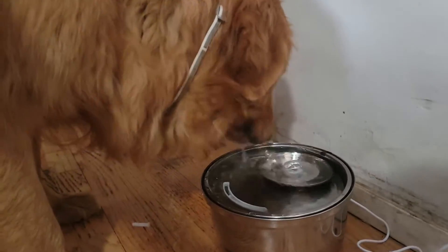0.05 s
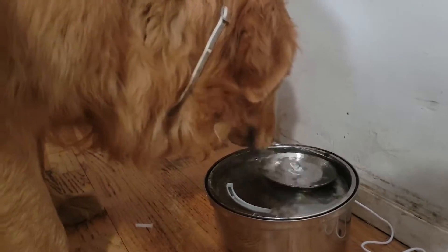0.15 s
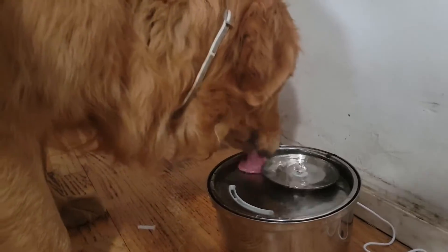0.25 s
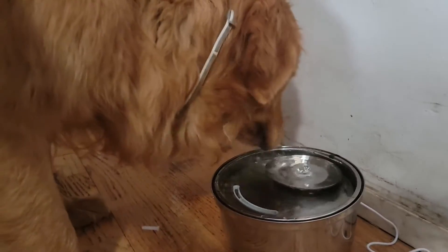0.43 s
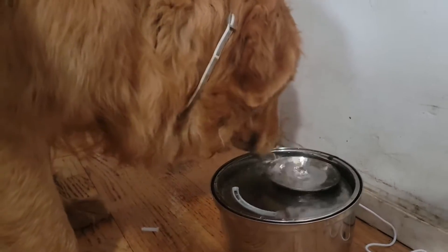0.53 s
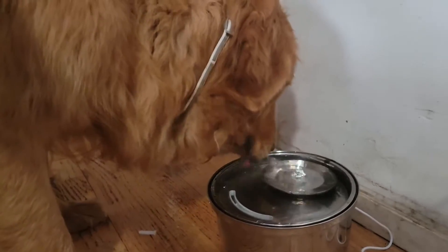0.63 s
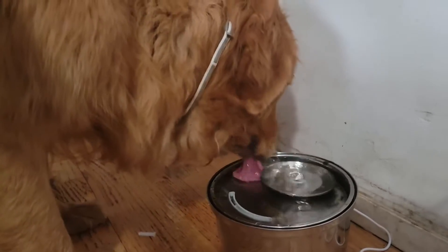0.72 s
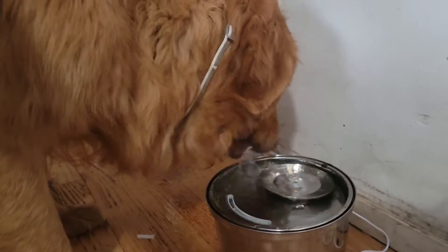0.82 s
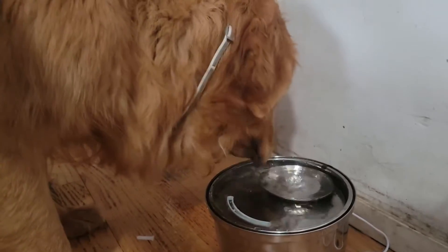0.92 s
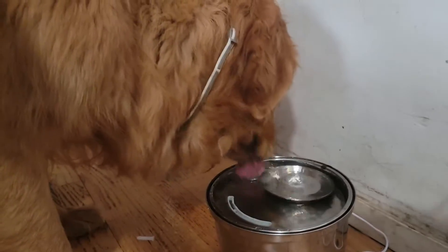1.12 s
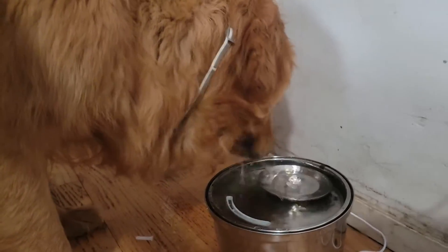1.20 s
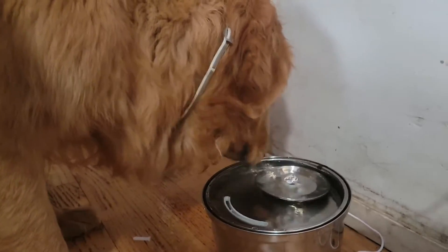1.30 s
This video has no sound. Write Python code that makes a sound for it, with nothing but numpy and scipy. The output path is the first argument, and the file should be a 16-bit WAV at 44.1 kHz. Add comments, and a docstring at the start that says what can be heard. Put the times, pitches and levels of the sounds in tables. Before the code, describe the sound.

A dog laps water from a small trickling fountain, with wet tongue smacks.

```python
"""A dog laps water from a small steel drinking fountain in a quiet room.
Each smack of the tongue excites the resonances of the mouth cavity; the tongue clicks as it peels free.
Trapped air resonates: small bubbles plink, large pockets gulp, and clouds of bubbles slosh in the bowl.
Bursting films tick. Underneath, the fountain trickles, gurgles and sizzles, and its pump hums."""
import sys
import numpy as np
from scipy import signal
from scipy.fft import rfft, irfft
from scipy.io import wavfile

SR = 44100
rng = np.random.default_rng(int(sys.argv[2]) if len(sys.argv) > 2 else 0)


def output_pcm(signal):
    """Save a mono or channel-first signal as 16-bit PCM at the path in sys.argv[1].

    Samples are clipped to [-1, 1] before scaling.
    """
    pcm = np.clip(np.atleast_2d(signal).T, -1, 1) * 32767
    wavfile.write(sys.argv[1], SR, np.round(pcm).astype(np.int16))


N = 59535
T = np.arange(N) / SR

# Level contour of the trickle: t/s, level/dB
TRICKLE_CONTOUR = [(0, -63.5), (0.13, -66.5), (0.23, -59), (0.36, -70.5), (0.57, -64), (0.66, -75),
                   (0.76, -88), (0.85, -70), (1.05, -67.5), (1.25, -75.5), (1.35, -64)]
# Spectrum of the trickle's hiss: f/Hz, relative density/dB
HISS_SPECTRUM = [(1500, -33), (3000, 4), (4200, 0), (4900, 7.5), (5800, -4), (7500, 0), (10000, -9.5),
                 (15500, -9)]
# Harmonics of the pump: harmonic number, level/dB, interaural phase/rad
PUMP_HARMONICS = [(1, -41.5, 0.17), (2, -54, 0.13), (3, -70.5, 0.42)]
# Spectrum of the room tone: f/Hz, relative density/dB
ROOM_TONE_SPECTRUM = [(22, -2.5), (45, 5.5), (100, 2.5), (170, -12), (300, -10.5), (600, -26), (2000, -21),
                      (4000, -33.5), (15000, -70)]
# Sizzles at the spout: crest t/s, level/dB
SPOUT_SIZZLES = [(0.049, -46.5), (0.537, -46.5), (0.654, -55.5)]
# Ringing bubbles and drops: t/s, f/Hz, level/dB
BUBBLE_PLINKS = [(0.184, 2110, -38.5), (0.187, 3820, -29.5), (0.196, 1430, -34.5), (0.242, 675, -33.5),
                 (0.260, 968, -24.5), (0.531, 4900, -29.5), (0.554, 3580, -28.5), (0.584, 2805, -28),
                 (0.593, 1520, -35.5), (0.685, 1490, -46.5), (0.736, 2060, -46), (0.733, 2910, -41.5),
                 (0.811, 2080, -44), (0.876, 2385, -42), (0.995, 1640, -41), (1.030, 768, -33),
                 (1.04, 1103, -26.5), (1.0718, 1482, -26.5), (1.071, 952, -23), (1.079, 5160, -25.5),
                 (1.08, 7070, -29), (1.081, 10550, -35), (1.172, 502, -36), (1.184, 912, -28.5),
                 (1.2175, 5090, -31), (1.27, 4270, -47), (1.280, 1104, -31.5), (1.326, 4080, -36),
                 (1.33, 2620, -33), (1.3365, 7800, -38), (1.337, 1300, -39.5)]
# Bursting films and spray: t/s, level/dB, centre f/Hz
FILM_TICKS = [(0.19, -35, 6400), (0.2735, -28.5, 12200), (0.41, -45, 5860), (0.784, -51.5, 2510),
              (0.812, -44.5, 2140), (0.794, -53, 3900), (0.924, -33, 850), (1.059, -44, 4430),
              (1.08, -41, 7560), (1.124, -34, 4070), (1.128, -34.5, 1440), (1.2209, -39.5, 5300),
              (1.278, -49.5, 1270), (1.2188, -42.5, 12600), (1.3234, -39, 5600), (1.326, -35, 2910),
              (1.335, -35, 5200)]
# Tongue smacks: t/s, level/dB, cavity f/Hz, relative rasp level/dB
TONGUE_SMACKS = [(0.1905, -34, 2960, 3), (0.2716, -8, 2123, -17), (0.5552, -31, 2260, -6),
                 (1.0682, -36, 2195, -26), (1.0742, -28, 2270, -3), (1.0797, -30, 2070, -0.5),
                 (1.0872, -32.5, 2110, -2), (1.3372, -34.5, 2860, -1)]
# Modes of the mouth: ratio to the cavity frequency, relative level/dB, T60/s
MOUTH_MODES = [(0.998, 2, 0.026), (1.321, -2.5, 0.026), (1.42, -2.5, 0.007), (1.87, -1, 0.0047)]
# Water stirred by the laps: crest t/s, rise constant/s, fall constant/s, level/dB, centre f/Hz
LAP_SLOSHES = [(0.248, 0.0063, 0.02, -40, 870), (0.583, 0.018, 0.06, -49.5, 682),
               (1.048, 0.05, 0.047, -41, 687), (1.128, 0.0056, 0.05, -43, 450),
               (1.138, 0.012, 0.053, -47.5, 2670), (0.193, 0.005, 0.01, -43, 3600),
               (0.549, 0.015, 0.024, -45.5, 3960), (1.048, 0.048, 0.036, -43.5, 1680),
               (1.288, 0.0075, 0.0081, -46.5, 1290), (0.549, 0.022, 0.042, -54, 14200),
               (0.865, 0.0061, 0.0041, -48, 6600), (1.338, 0.0049, 0.0069, -51, 3570)]
# Resonating air pockets: t/s, f/Hz, level/dB, T60/s
POCKET_GULPS = [(0.225, 175, -44.5, 0.068), (0.233, 294, -38, 0.11), (0.572, 287, -42.5, 0.13),
                (0.58, 174.5, -32, 0.055), (1.026, 80, -29.5, 0.13), (1.048, 193, -30, 0.017),
                (1.123, 202, -42.5, 0.026)]
# Dry clicks of the tongue: t/s, peak level/dB, centre f/Hz
PEEL_CLICKS = [(0.926, -32, 2520), (0.938, -40, 5000), (0.9525, -56, 7100), (0.9598, -43, 9050),
               (0.969, -40.5, 6440), (0.982, -61, 7000), (0.9895, -23.5, 3900)]
# Interaural level difference: t/s, left minus right level/dB
EAR_BALANCE = [(0.85, 0), (1.05, -4), (1.25, -.5)]
# Reverberation of the room: f/Hz, level/dB, T60/s
REVERB_BANDS = [(201, -5, 0.47), (626, -12, 0.14), (1530, -5.5, 0.03), (2100, -30, 0.19), (2640, -13, 0.23),
                (3750, -12, 0.062), (5000, -10, 0.035), (12800, -14.5, 0.041)]

LN_1000 = np.log(1000)  # amplitude falls a thousandfold in one T60
CLOUD_BUBBLES_PER_S = 1500


def from_db(db):
    """Amplitude grows tenfold for every 20 dB."""
    return 10 ** (np.asarray(db) / 20)


def unit_rms(x):
    """Dividing by the RMS amplitude gives unit power."""
    return x / np.sqrt(np.mean(x ** 2) + 1e-20)


def at_hz(table, hz, column=1):
    """Pitch is logarithmic, so spectra are interpolated in log frequency."""
    points = np.array(table)
    return np.interp(np.log(hz + 1e-9), np.log(points[:, 0]), points[:, column])


def band(x, low, high):
    """A causal band-pass filter attenuates frequencies beyond its edges."""
    edges = [min(low, .3 * SR), min(high, .45 * SR)]
    return signal.sosfilt(signal.butter(2, edges, "band", fs=SR, output="sos"), x)


def noise(spectrum):
    """Spectral weighting colours two independent channels of white noise."""
    gain = from_db(at_hz(spectrum, np.arange(N // 2 + 1) * SR / N))
    return unit_rms(irfft(rfft(rng.standard_normal((2, N))) * gain, N))


def ping(onset, hz, db, t60, attack_s, rise_per_s=0):
    """A damped oscillator swells, then decays exponentially; its frequency may glide upward."""
    t = np.maximum(T - onset, 0)
    swell = np.sin(np.pi / 2 * np.minimum(t / attack_s, 1)) ** 2
    decay = np.exp(-LN_1000 * np.clip((t - attack_s) / t60, 0, 2))
    return from_db(db) * swell * decay * np.sin(2 * np.pi * hz * t * (1 + rise_per_s * t / 2))


def burst(onset, db, hz, t60, edge_ratio):
    """Band-limited noise with a fast exponential decay is heard as a crackle."""
    decay = (T >= onset) * np.exp(-LN_1000 * np.clip((T - onset) / t60, 0, 2))
    crackle = band(rng.standard_normal(N) * decay, hz / edge_ratio, hz * edge_ratio)
    return from_db(db) * np.sqrt(SR / 2 / hz) * crackle


def bubble_cloud(per_s, centre_hz, octaves, t60_cycles, spread_db=-1.5, sizes=24):
    """Random impulses excite bubble resonators, weighted by a Gaussian in log frequency."""
    cloud = np.zeros(N)
    for deviation in np.linspace(-2, 2, sizes):
        hz = centre_hz * 2 ** (octaves * (deviation + rng.uniform(-0.11, 1) / sizes))
        births = rng.random(N) < per_s / sizes / SR
        strength = from_db(spread_db * np.minimum(rng.exponential(1, N), 4))
        impulses = births * strength * rng.choice([-1, 1], N)
        radius = np.exp(-LN_1000 * hz / (t60_cycles * SR))
        feedback = [1, -2 * radius * np.cos(2 * np.pi * hz / SR), radius * radius]
        ringing = signal.lfilter([1, 0, -1], feedback, impulses + 1e-18)
        cloud += (hz < CUTOFF_HZ) * np.exp(-deviation ** 2 / 2) * np.sqrt(hz) * ringing
    return unit_rms(band(cloud, centre_hz / 4 ** octaves, centre_hz * 4 ** octaves))


def trickle():
    """Running water traps resonating bubbles: high drips and a low gurgle follow the level of its hiss."""
    flow_db = np.interp(T, *np.transpose(TRICKLE_CONTOUR))
    gurgle_db = -62 + 0.8 * (flow_db - flow_db.mean())
    drips = bubble_cloud(per_s=910, centre_hz=4370, octaves=1.0, t60_cycles=99, spread_db=3)
    gurgle = bubble_cloud(per_s=200, centre_hz=985, octaves=0.72, t60_cycles=11.6, spread_db=3)
    bubbling = from_db(flow_db + 0.5) * drips + from_db(gurgle_db) * gurgle
    hiss = from_db(flow_db + 10) * noise(HISS_SPECTRUM)
    return bubbling, hiss


def pump(mains_hz=59.44, waver_depth=.035):
    """The pump vibrates at harmonics of the mains frequency, with slight amplitude modulation."""
    waver = unit_rms(band(rng.standard_normal(2 * N), 6.6, 6.87)[N:])
    hum = 0
    for harmonic, db, phase in PUMP_HARMONICS:
        amplitude = from_db(db) * np.sqrt(2) * (1 + waver_depth * harmonic * waver)
        hum += amplitude * np.sin(2 * np.pi * mains_hz * harmonic * T + np.array([[0], [phase]]))
    return hum


def room_tone():
    """Steady low noise, uncorrelated between the ears, is heard as diffuse."""
    return from_db(-50) * noise(ROOM_TONE_SPECTRUM)


def sizzles():
    """Tiny bubbles of nearly one size resonate in a narrow band at the spout."""
    swell = sum(from_db(db) * np.exp(-np.abs(T - crest) / 0.014) for crest, db in SPOUT_SIZZLES)
    return swell * bubble_cloud(CLOUD_BUBBLES_PER_S, centre_hz=4780, octaves=0.077, t60_cycles=53)


def bubbles():
    """Trapped air is a spring against the water's mass; higher-pitched bubbles decay sooner."""
    return sum(ping(onset, hz, db, t60=0.031 * (hz / 1000) ** -0.36, attack_s=1.55 / hz, rise_per_s=1.34)
               for onset, hz, db in BUBBLE_PLINKS)


def ticks():
    """A bursting film radiates a noise transient a few milliseconds long."""
    return sum(burst(onset, db, hz, t60=0.015, edge_ratio=1.5) for onset, db, hz in FILM_TICKS)


def smacks():
    """The tongue snaps free with a wet rasp and excites the normal modes of the mouth cavity."""
    rings = sum(ping(onset, hz * ratio, db + mode_db, t60, attack_s=0.0008)
                for onset, db, hz, _ in TONGUE_SMACKS for ratio, mode_db, t60 in MOUTH_MODES)
    rasps = sum(burst(onset, db + rasp_db, hz * 1.12, t60=.018, edge_ratio=1.38)
                for onset, db, hz, rasp_db in TONGUE_SMACKS)
    return rings + rasps


def sloshes():
    """Bubbles in stirred water add incoherently, in clouds that swell and fade."""
    water = 0
    for crest, rise, fall, db, hz in LAP_SLOSHES:
        swell = from_db(db) * np.exp(-np.maximum((crest - T) / rise, (T - crest) / fall))
        water += swell * bubble_cloud(CLOUD_BUBBLES_PER_S, hz, octaves=.72, t60_cycles=22)
    return water


def gulps():
    """Large air pockets resonate at low frequencies as the tongue pushes water."""
    return sum(ping(onset, hz, db, t60, attack_s=0.85 / hz, rise_per_s=0.28)
               for onset, hz, db, t60 in POCKET_GULPS)


def tongue_clicks(edge_ratio=1.35):
    """The tongue peels free in clicks, each the impulse response of a broad resonance."""
    clicks = 0
    for onset, db, hz in PEEL_CLICKS:
        impulse = np.arange(N) == int(onset * SR)
        click = band(impulse + 1e-18, hz / edge_ratio, hz * edge_ratio)
        clicks += from_db(db) * click / np.abs(click).max()
    return clicks


def placed(x, lag_s):
    """Interaural differences of time and level place a source a little to the right."""
    delay = np.exp(-1j * np.pi * np.arange(N + 1) * SR / N * lag_s)
    left = irfft(rfft(x, 2 * N) * delay)[:N]
    balance_db = np.interp(T, *np.transpose(EAR_BALANCE))
    return np.array([left, x]) * from_db(balance_db * [[.5], [-.5]])


def reverberation(x, delay_s=0.0066):
    """Diffuse reflections form a noise tail that decays exponentially in each band."""
    edges, tail = np.geomspace(100, 17000, 19), 0
    for low, high in zip(edges, edges[1:]):
        hz = np.sqrt(low * high)
        decay = (T > delay_s) * np.exp(-LN_1000 * T / at_hz(REVERB_BANDS, hz, column=2))
        reflections = rng.standard_normal((2, N)) * decay / np.sqrt(np.sum(decay ** 2))
        tail += from_db(at_hz(REVERB_BANDS, hz)) * band(reflections, low, high)
    return signal.fftconvolve(tail, x[None], axes=1)[:, :N]


def scene():
    """Direct sound, reverberation and background add by superposition."""
    bubbling, hiss = trickle()
    water = bubbling + sizzles() + bubbles() + ticks() + sloshes() + gulps()
    mouth = smacks() + tongue_clicks()
    direct = placed(mouth, lag_s=.00012) + placed(water, lag_s=.00047)
    return direct + reverberation(mouth + water) + hiss + pump() + room_tone()


def record(dry):
    """An elliptic low-pass filter cuts the highest treble steeply."""
    return signal.sosfilt(signal.ellip(10, .2, 80, CUTOFF_HZ, fs=SR, output="sos"), dry)


CUTOFF_HZ = 16300

dry = scene()
out = record(dry)
output_pcm(out)
```